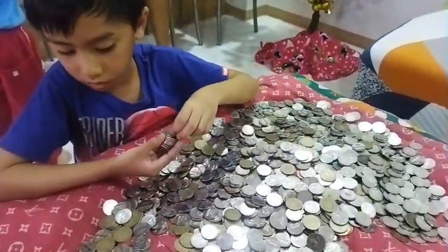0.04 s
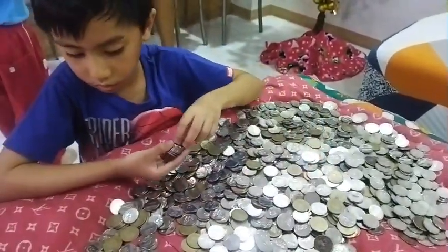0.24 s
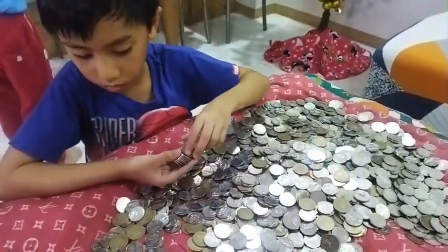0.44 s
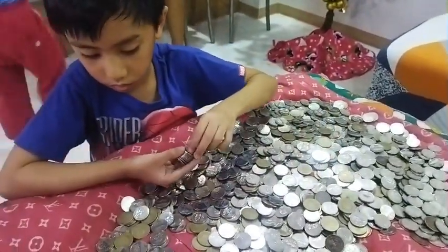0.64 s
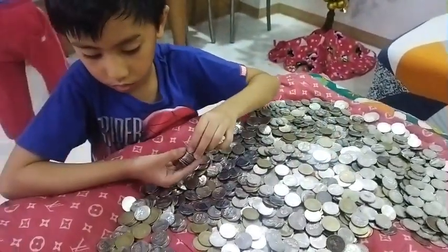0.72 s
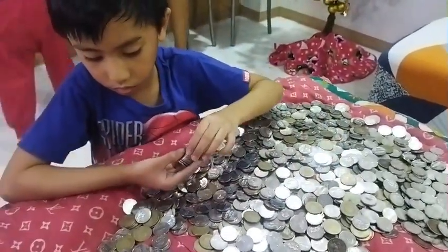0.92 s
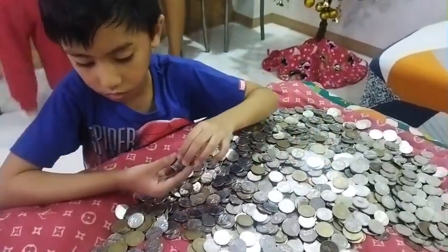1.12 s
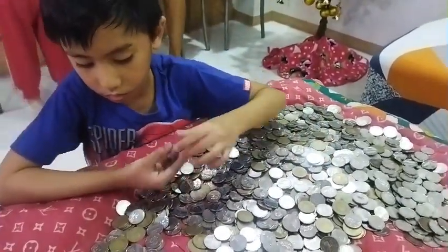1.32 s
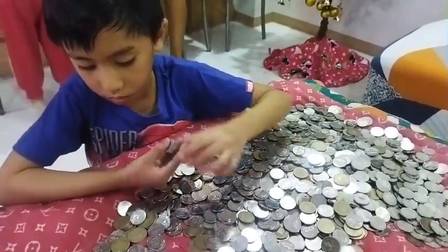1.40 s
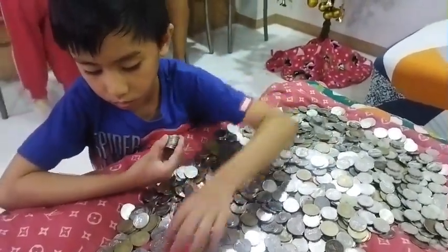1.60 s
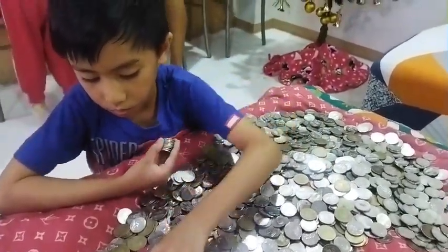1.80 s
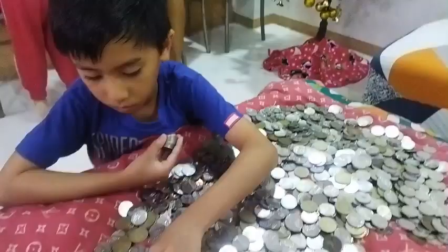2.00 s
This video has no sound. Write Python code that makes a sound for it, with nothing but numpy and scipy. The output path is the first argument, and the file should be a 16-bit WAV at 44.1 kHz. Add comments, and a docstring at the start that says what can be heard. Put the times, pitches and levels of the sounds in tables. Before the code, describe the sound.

Metal coins handled over a heap on cloth. Near 0.2 s a quick cluster of thin, very high clinks rings and fades. A barely audible scrape and ticks come around 0.5-0.8 s, faint stirring around 1.2-1.4 s, a small clink near 1.6 s. From 1.8 s to the end a hand digs in: loud, bright, dense clatter and jingling. Lively hard-walled room, soft steady low hum, phone stereo, treble cut at the very top.

```python
"""Coins clink and clatter over a heap on a cloth in a hard-walled room, heard by a phone's two microphones.
Each clink is a few dying sines near the top of hearing, with a short noise crack.
A hand stirs the heap, made of many random ticks that ring coins, and finally digs in.
A soft scrape is noise through a sliding resonance. Random echoes smear every clink.
A low hum of the house, made of shaped noise, lies under all."""
import sys
import numpy as np
from scipy import signal
from scipy.fft import rfft, irfft
from scipy.io import wavfile

SR = 44100
rng = np.random.default_rng(int(sys.argv[2]) if len(sys.argv) > 2 else 0)


def how_loud(loudness_db):
    """Turn decibels into a plain amplitude multiplier (0 dB gives 1, 20 dB gives 10)."""
    steps = np.asarray(loudness_db, float) / 20
    return 10 ** steps


def put_to_file(sound):
    """Save the sound as 16-bit audio at rate SR, in the file named by the first command-line argument."""
    columns = np.atleast_2d(sound).T  # one column per channel
    safe = np.clip(columns, -1, 1)
    whole_steps = np.round(safe * 32767)
    wavfile.write(sys.argv[1], SR, whole_steps.astype(np.int16))


N = 90581  # length in samples

# Two small coins meet. Each row: start in seconds, ring level in dB, base pitch of one coin in Hz,
# base pitch of the other in Hz, crack level in dB.
CLINKS = [(.195, -32, 15390, 15060, -24.5), (.199, -27.5, 15100, 15060, -22.5),
          (.204, -25, 15700, 15005, -31), (0.212, -23, 15400, 15060, -21.5), (.224, -27, 15400, 14950, -39),
          (1.565, -26.5, 15500, 15225, -30), (1.578, -44, 15600, 15225, -29.5),
          (1.595, -38, 15600, 15075, -28), (1.775, -54, 15300, 14950, -34.5),
          (1.794, -55, 15300, 14700, -39), (1.801, -49, 15500, 14900, -24),
          (1.812, -18.5, 15300, 15100, -25), (1.821, -13, 15600, 15100, -15),
          (1.843, -20, 15555, 15390, -37), (1.883, -19, 15500, 15105, -15.5),
          (1.902, -21, 15554, 15100, -20), (1.944, -25, 15900, 15217, -15),
          (1.998, -22.5, 15500, 15005, -15), (2.018, -31, 15600, 15100, -21)]
# Sines of a small coin. Each row: pitch as a ratio to the base pitch (ratio 2 is too high for
# the sample rate and folds down to about 13 kHz), level in dB, time to fall by 60 dB in seconds.
SMALL_COIN = [(1.0, -2.5, 0.11), (1.004, 0.5, 0.099), (2, -32, 0.04), (1.3, -37, .05), (0.665, -17, .05)]
# A large coin is struck. Each row: start in seconds, level in dB.
CLANKS = [(1.878, -43), (1.900, -21), (1.922, -31), (1.958, -23), (1.990, -21), (2.016, -26)]
# Ways the large coin rings. Each row: pitch in Hz, level in dB, time to fall by 60 dB in seconds.
LARGE_COIN = [(13870, -6, .2), (13925, -8, .2), (13778, -11, .2), (13534, -15, .2), (14702, -11, .15),
              (7903, -10, .3), (8200, -18, .1), (9889, -19, .2)]
# Tone colour of the cracks. Each row: frequency in Hz, relative level in dB.
CRACK_COLOUR = [(1500, -19), (3600, -24), (4300, -4), (5300, -11.5), (6300, -6.5), (9000, -1.5),
                (12000, -1), (14000, 5), (16000, 6.5)]
# How hard the hand stirs the heap. Each row: time in seconds, clatter level in dB,
# drive of the ringing over the clatter in dB.
STIR = [(0, -79, -3), (.55, -71.5, -3), (.68, -59, -18), (.8, -57.5, -19), (.86, -74, -30),
        (1.12, -77, -14), (1.2, -53.5, -15), (1.33, -53, 3), (1.352, -51, 13), (1.37, -56.5, 8),
        (1.42, -86, 5), (1.47, -77, -4), (1.768, -65.5, -20), (1.776, -53, 0), (1.803, -49, -2),
        (1.812, -27.5, 3), (1.818, -30.5, -8), (1.9, -34.5, 15.5), (2.06, -31.5, 8)]
# Tone colour of the clatter. Each row: frequency in Hz, relative level in dB.
CLATTER_COLOUR = [(250, -33), (500, -11), (1100, -5.5), (2000, 0.5), (4000, 2), (7000, -2), (10000, 0.5),
                  (13000, 2.5), (16000, -0.5)]
# Lower pitches of stacked coins, strong only when the hand digs in. Each row: pitch in Hz, level in dB.
STACKS = [(2400, -21), (2778, -30), (3600, -7), (4409, 2), (5346, -8), (6083, 6), (6298, 6), (8662, -16),
          (9049, -21), (10282, -12), (11090, -10), (12550, -9)]
# A soft scrape in the middle range. Each row: time in seconds, level in dB, centre frequency in Hz.
SCRAPE = [(.52, -59, 2407), (.59, -55, 2616), (.635, -69, 2300), (.65, -68, 2800), (.68, -57.5, 2920),
          (.76, -84, 2880)]
# How fast the echoes die. Each row: frequency in Hz, time to fall by 60 dB in seconds.
ROOM_DECAY = [(500, 0.42), (2000, 0.46), (5000, 0.49), (10000, 0.49), (15500, 0.29)]
# Tone colour of the hum. Each row: frequency in Hz, relative level in dB.
HUM_COLOUR = [(25, -34), (50, -17.5), (72, -10.5), (90, 1.5), (125, -2), (190, 0.5), (240, -4), (400, -5),
              (520, -11.5), (960, -11), (2050, -14), (3000, -18.5), (4500, -23), (7100, -30), (11000, -28),
              (16000, -33)]
# Likeness of the hum in the two microphones. Each row: frequency in Hz, left-right correlation from -1 to 1.
HUM_LIKENESS = [(60, 0.93), (200, 0.93), (400, 0.81), (700, 0.63), (1200, -0.42), (2500, 0.15),
                (8000, -0.14)]

CRACK_FADE_S = 0.0041  # time for a crack's noise to fall to 37 percent
TICKS_PER_S, TICK_SPREAD_DB = 1500, 7
HEAP_LOW_HZ, HEAP_HIGH_HZ, HEAP_T60_S = 15100, 15670, 0.032  # T60: time to fall by 60 dB
STACK_T60_S = 0.069
# coins lying on others buzz briefly, mostly at lower pitches; the share is a part of the power
BUZZ_LOW_HZ, BUZZ_HIGH_HZ, BUZZ_T60_S, BUZZ_SHARE = 1000, 14500, 0.025, 0.4
SCRAPE_WIDTH_HZ = 900
CROSSFADE_S = 0.05  # pace at which the sound crossfades between three random echo patterns
DIRECT_DB, ROOM_DB, LEFT_OVER_RIGHT_DB = -6, 2, 1
HUM_DB = -52.5
EDGE_HZ = 15800


def read(points, hz):
    """Reads a table at given frequencies, spaced as the ear hears pitch."""
    f, value = np.transpose(points)
    return np.interp(np.log(hz + 1), np.log(f + 1), value)


def curve(points, column):
    """Draws one column of a table along time."""
    p = np.transpose(points)
    return np.interp(np.arange(N) / SR, p[0], p[column])


def evened(x):
    """Scales to an rms of 1."""
    return x / np.sqrt(np.mean(x ** 2) + 1e-20)


def add(mix, s, sound):
    """Mixes a sound in at time s, in seconds."""
    part = mix[round(s * SR):][:len(sound)]
    part += sound[:len(part)]


def colour(x, points):
    """Filters by a tone colour whose mean power gain is 1."""
    gain = how_loud(read(points, np.fft.rfftfreq(N + 2048, 1 / SR)))
    spectrum = rfft(np.pad(x, (0, 2048)))
    return irfft(spectrum * evened(gain))[:N]


def ring(modes, turns):
    """Struck metal: a sum of dying sines, each starting at its own part of a turn."""
    t = np.arange(SR // 2) / SR
    return sum(how_loud(db - 60 * t / t60) * np.sin(2 * np.pi * (hz * t + turn))
               for (hz, db, t60), turn in zip(modes, turns))


def unit_tap(hz, t60):
    """One dying sine with an energy of 1."""
    tap = ring([(hz, 0, t60)], [0])
    return tap / np.linalg.norm(tap)


def clinks():
    """Each contact of small coins rings both and makes a short crack; a struck large coin only rings."""
    tones, cracks = np.zeros(N), np.zeros(N)
    turns = 0.094 * rng.random((len(CLINKS), 2, len(SMALL_COIN)))
    noise = rng.standard_normal((len(CLINKS), 1024))
    crack_fade = np.exp(-np.arange(1024) / SR / CRACK_FADE_S)
    for (s, db, one, other, crack_db), pair_turns, puff in zip(CLINKS, turns, noise):
        for hz, coin_turns in zip((one, other), pair_turns):
            modes = [(hz * ratio, level, t60) for ratio, level, t60 in SMALL_COIN]
            add(tones, s, how_loud(db) * ring(modes, coin_turns))
        add(cracks, s, how_loud(crack_db) * puff * crack_fade)
    for (s, db), coin_turns in zip(CLANKS, rng.random((len(CLANKS), len(LARGE_COIN)))):
        add(tones, s, how_loud(db) * ring(LARGE_COIN, coin_turns))
    return tones + colour(buzz(cracks), CRACK_COLOUR)


def heap(count=40):
    """Many small contacts tick and ring one of many coins; hard stirring also rings the stacks."""
    tick_size = how_loud(TICK_SPREAD_DB * np.minimum(rng.exponential(1, N), 4))
    ticks = tick_size * (rng.random(N) < TICKS_PER_S / SR)
    ticks = evened(ticks * rng.choice([-1., 1.], N))
    stir_db = curve(STIR, column=1)
    ticks = ticks * how_loud(stir_db)

    which = rng.integers(0, count, N)  # the coin that each tick rings
    driven = ticks * how_loud(curve(STIR, column=2))
    pitches = np.linspace(HEAP_LOW_HZ, HEAP_HIGH_HZ, count) + rng.uniform(-8, 4.1, count)
    rung = np.zeros(N)
    for k, hz in enumerate(pitches):
        rung += signal.oaconvolve(driven * (which == k), unit_tap(hz, HEAP_T60_S))[:N]

    # applying the stir level again leaves mainly the hardest stirring
    hard = ticks * how_loud(stir_db - stir_db.max())
    for k, (hz, db) in enumerate(STACKS):
        rung += how_loud(db) * signal.oaconvolve(hard * (which == k), unit_tap(hz, STACK_T60_S))[:N]
    return colour(buzz(ticks), CLATTER_COLOUR) + rung


def buzz(x, count=48):
    """Every 2 ms slice of a contact noise rings up to three of many damped coins beside its dry tick."""
    which = np.repeat(rng.integers(0, count, (3, N // 88 + 1)), 88, axis=1)[:, :N]
    pitches = np.geomspace(BUZZ_LOW_HZ, BUZZ_HIGH_HZ, count) * rng.uniform(0.96, 1.02, count)
    rung = np.zeros(N)
    for k, hz in enumerate(pitches):
        tap = ring([(hz, 0, BUZZ_T60_S)], [0])[:SR // 8]
        tap = tap * np.sqrt(hz / pitches.mean()) / np.linalg.norm(tap)  # higher pitches ring louder
        rung += signal.oaconvolve(x * (which == k).any(0), tap)[:N]
    return np.sqrt(1 - BUZZ_SHARE) * x + np.sqrt(BUZZ_SHARE / 3) * rung


def scrape():
    """Noise in one broad resonance that slides, mostly upwards."""
    r, t = np.exp(-np.pi * SCRAPE_WIDTH_HZ / SR), np.arange(N) / SR
    noise = rng.standard_normal(N) + 1j * rng.standard_normal(N)
    slow = signal.lfilter([1], [1, -2 * r, r * r], noise)
    # turning the slow noise lifts it to the centre frequency
    turning = np.exp(2j * np.pi * np.cumsum(curve(SCRAPE, column=2)) / SR)
    band = (slow * turning).real
    sounding = (t > SCRAPE[0][0]) * (t < SCRAPE[-1][0])
    return how_loud(curve(SCRAPE, column=1)) * evened(band) * sounding


def room(x, count=3):
    """Dense random echoes in several patterns, other ones for each microphone; each band dies at its own speed."""
    onset = np.minimum(np.arange(SR // 2) / SR / 0.0022, 1)  # echoes build up over 2.2 ms
    taps = rng.standard_normal((count, 2, SR // 2)) * onset
    hz, t, z = signal.stft(taps, SR, nperseg=256)
    dying = how_loud(-60 * t / read(ROOM_DECAY, hz)[:, None])
    tail = signal.istft(z * dying, SR, nperseg=256)[1]
    tail = tail / np.linalg.norm(tail[0, 0])
    # the sound crossfades between the patterns, its total power staying even
    steps = np.arange(N) / SR / CROSSFADE_S + np.arange(count)[:, None]
    blend = np.sqrt(2 / count) * np.cos(np.pi * steps / count)
    return signal.fftconvolve((x * blend)[:, None], tail, axes=2).sum(0)[:, :N]


def hum():
    """Steady shaped noise, most alike in the two microphones in the bass."""
    hz = np.fft.rfftfreq(N, 1 / SR)
    a, b = rfft(rng.standard_normal((2, N)))
    same = np.clip(read(HUM_LIKENESS, hz), -1, 1)
    pair = np.array([a, same * a + np.sqrt(1 - same ** 2) * b])
    both = irfft(pair * how_loud(read(HUM_COLOUR, hz)), N)
    return how_loud(HUM_DB) * both / np.sqrt(np.mean(both.mean(0) ** 2))


def scene():
    """Coins, direct and through the room, over the hum."""
    coins = clinks() + heap() + scrape()
    # the direct sound reaches the left microphone 12 samples later
    direct = np.array([np.pad(coins, (12, 0))[:N], coins])
    balance = how_loud(np.array([[LEFT_OVER_RIGHT_DB / 2], [-LEFT_OVER_RIGHT_DB / 2]]))
    return (how_loud(DIRECT_DB) * direct + how_loud(ROOM_DB) * room(coins)) * balance + hum()


def top_cut(x):
    """Nothing passes above the cut-off."""
    return signal.sosfilt(signal.butter(12, 16380, fs=SR, output="sos"), x)


def record(dry):
    """Cuts off the highest treble with a steep filter and finishes the mix."""
    edge = signal.firwin(511, EDGE_HZ, window=("kaiser", 9), fs=SR)
    mix = signal.oaconvolve(dry, edge[None], "same")
    return top_cut(mix)


dry = scene()
out = record(dry)
put_to_file(out)
```